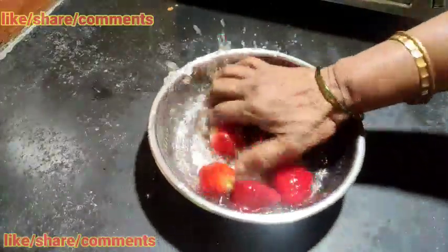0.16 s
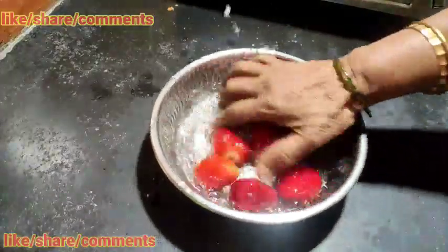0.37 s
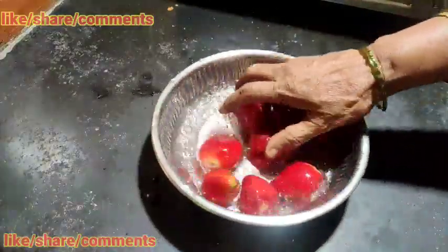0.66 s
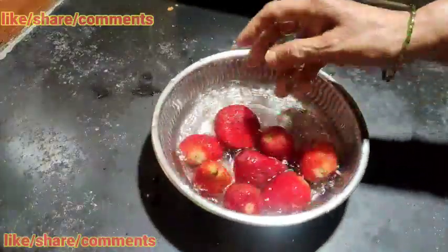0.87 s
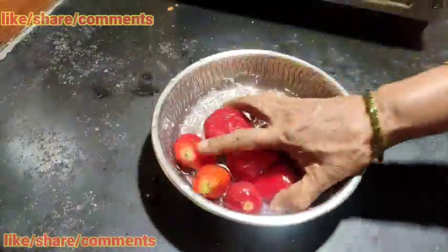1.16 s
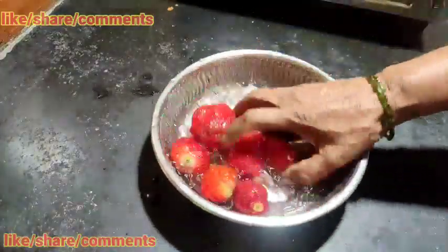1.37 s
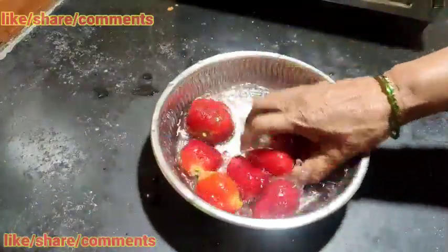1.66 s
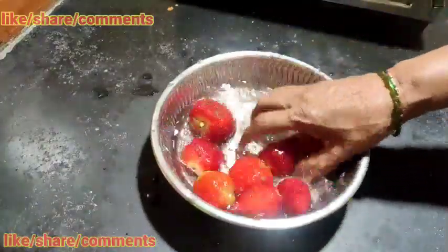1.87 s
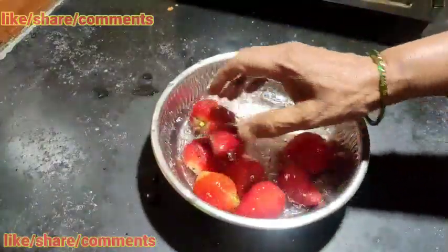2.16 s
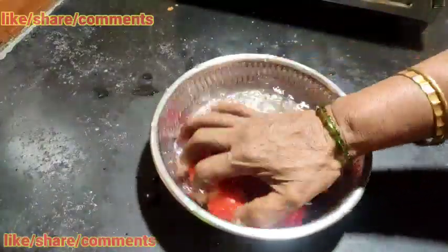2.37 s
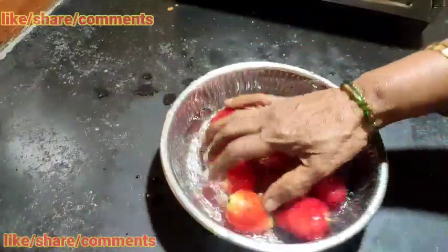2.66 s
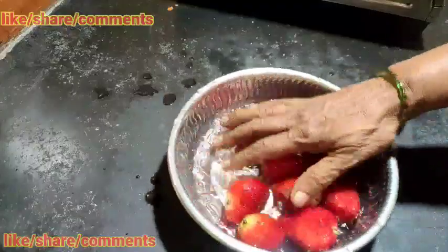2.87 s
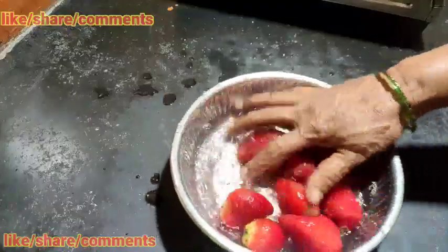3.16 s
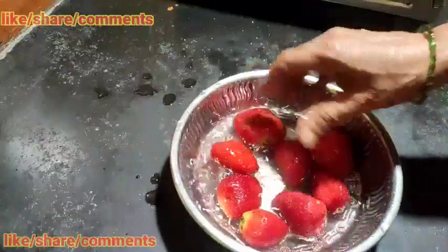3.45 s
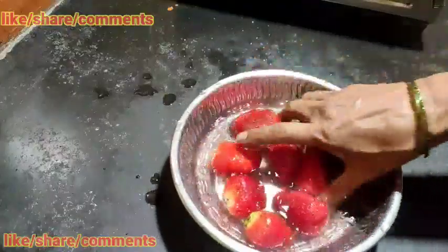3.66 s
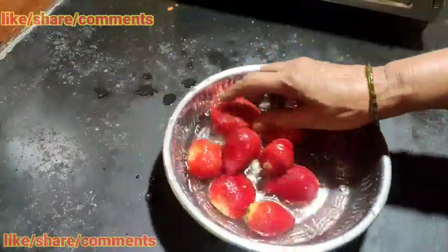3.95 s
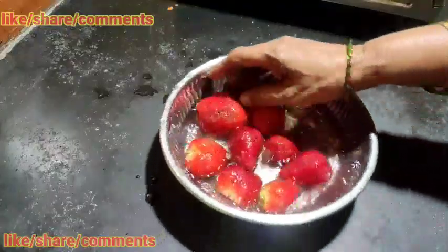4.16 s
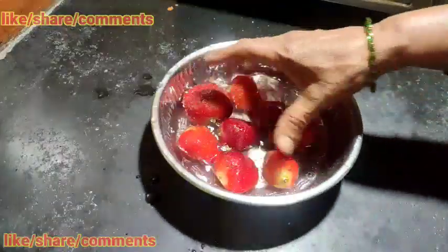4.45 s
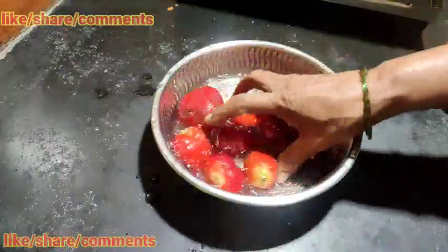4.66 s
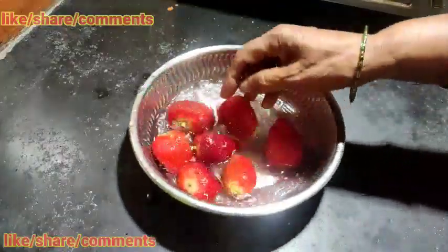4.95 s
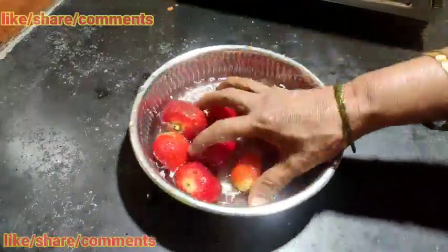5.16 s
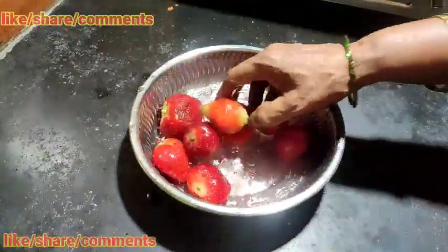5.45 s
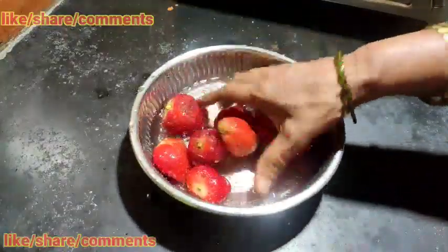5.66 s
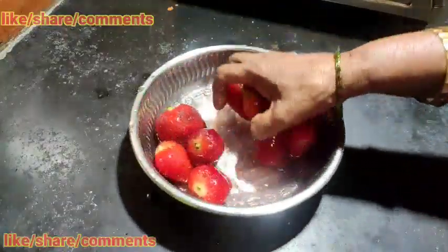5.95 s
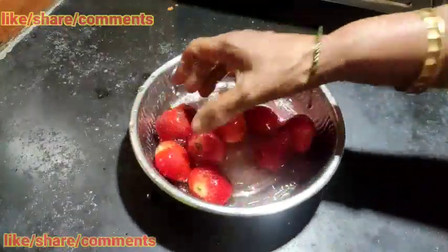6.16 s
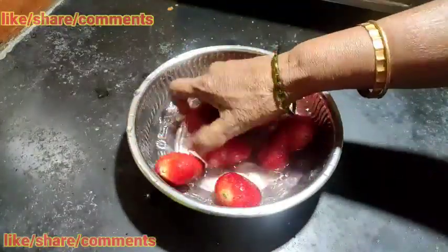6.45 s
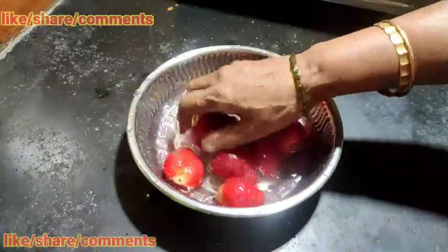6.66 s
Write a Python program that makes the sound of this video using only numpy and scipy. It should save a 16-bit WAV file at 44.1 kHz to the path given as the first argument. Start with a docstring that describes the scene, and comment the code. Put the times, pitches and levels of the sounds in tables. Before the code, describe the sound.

Close stereo view of a hand washing strawberries in a thin steel bowl on a wet stone counter. Loud splashes and hard bright knocks open it, then the bowl drops and rolls briefly to rest. Softer swishing, bubbly plops, wet smacks, gritty scrapes and scattered clanks follow, with small bangle clinks. A small kitchen gives a short tail over a faint low rumble.

```python
"""Fruit washed in a steel bowl

A hand swishes strawberries in a little water in a thin steel bowl on a wet stone counter. Damped modes
make the knocks, bumps and clinking bangles; shaped noise makes the hiss of sliding, the smacks and the spray;
decaying sines make the bubbles. Once the bowl drops back and rolls to rest on gliding bands of noise.
A small kitchen answers in a noise tail, over a low rumble, a drone and a hum."""
import sys
import numpy as np
from scipy import signal
from scipy.fft import rfft, irfft, next_fast_len
from scipy.io import wavfile
from scipy.ndimage import map_coordinates

SR = 44100
rng = np.random.default_rng(int(sys.argv[2]) if len(sys.argv) > 2 else 0)


def to_wav(sig):
    """Store sig (one row per channel, or 1-D mono) as 16-bit WAV at the path in sys.argv[1].

    Samples outside -1..1 are clipped; the rate is SR.
    """
    pcm = np.clip(np.atleast_2d(sig), -1, 1) * 32767
    pcm = np.round(pcm).astype(np.int16)
    wavfile.write(sys.argv[1], SR, pcm.T)  # frames by channels


N = 300143
T = np.arange(N) / SR  # time in the scene, s
AGE = T[:SR // 2]  # time since the onset of one sound, s


def amp(db):
    """Logarithmic level: decibels to gain."""
    return 10 ** (np.asarray(db) / 20)


def unit(x):
    """Normalization of power: scale to rms 1."""
    return x / np.sqrt(np.mean(x ** 2))


def spectrum(points):
    """Spectral envelope: gain over frequency from (Hz, dB) points, falling away below the first."""
    hz, db = np.transpose(points)
    return lambda f: amp(np.interp(np.log(f), np.log(hz), db)) * np.minimum(f / hz[0], 1) ** 2


def resonances(modes):
    """Modal response: gain over frequency of (Hz, width Hz, dB) resonances, their powers added."""
    return lambda f: np.sqrt(sum(amp(db) ** 2 / (1 + ((f - hz) / width) ** 2) ** 2
                                 for hz, width, db in modes))


def colour(x, gain):
    """Linear filtering: multiply the spectrum by a gain that depends on frequency."""
    length = x.shape[-1]
    size = next_fast_len(length + 2048)
    f = np.maximum(np.arange(size // 2 + 1) * SR / size, 1)
    return irfft(rfft(x, size) * gain(f), size)[..., :length]


def spread(mid, side, wide_hz=1300, least=0.075):
    """Spatial coherence: two spaced microphones hear alike in the bass, unrelated in the treble."""
    side = colour(side, lambda f: np.minimum(least + f / np.hypot(f, wide_hz), 1))
    return np.array([mid + side, mid - side])


def noise(gain, size=N):
    """Coloured random process: stereo noise of rms 1 with the given spectrum."""
    white = rng.standard_normal((2, size))
    return unit(colour(spread(*white), gain))


def ring(hz, envelope):
    """Phase difference: a mode reaches two microphones further out of step the higher it is, up to a limit."""
    start = rng.uniform(0, 2 * np.pi)
    leading_side = np.array([[1], [-1]]) * rng.choice([-1, 1])
    phase = start + leading_side * min(hz / 3600, .75) * rng.uniform(0.44, 1.9)
    return envelope * np.sin(2 * np.pi * hz * AGE + phase)


def add(out, s, sound):
    """Superposition: mix a sound in at time s."""
    i = max(int(s * SR), 0)
    out[:, i:i + sound.shape[1]] += sound[:, :max(N - i, 0)]


def moves(rows, attack_s, release_s):
    """Addition of powers: gain over time of movements that each gather speed, hold and die away."""
    power = 0
    for s, length, db in rows:
        rise = np.clip((T - s) / attack_s, 0, 1)
        fall = np.exp(-np.maximum(T - s - length, 0) / release_s)
        power = power + (amp(db) * rise * fall) ** 2
    return np.sqrt(power)


# The hand strokes through the water. Each row: start in seconds, length in seconds, level in dB.
STROKES = [(-.05, 0.28, -40.5), (.16, .16, -37.5), (.35, 0.14, -43.5), (.64, .14, -42), (1.13, 0.31, -48.5),
           (1.55, 0.34, -46), (1.945, 0.085, -41), (2.05, 0.14, -51), (2.3, 0.63, -49.5), (2.75, .26, -42),
           (3.1, 0.24, -56.5), (3.62, 0.64, -55.5), (4.6, 0.27, -54), (5.3, 0.12, -47), (5.78, 0.071, -45),
           (6.02, 0.46, -63), (6.68, 0.091, -57.5)]
STROKE_ATTACK_S, STROKE_RELEASE_S, RIPPLE_DB = 0.038, 0.068, -65


def stirring():
    """Flow agitation: the strength of the strokes over time, above a constant ripple."""
    return np.hypot(moves(STROKES, STROKE_ATTACK_S, STROKE_RELEASE_S), amp(RIPPLE_DB))


def bubble(hz, cycles, glide=0.029):
    """Bubble resonance: a trapped bubble rings and fades, rising in pitch as it nears the surface."""
    life = max(cycles, 1) / hz  # seconds to fade by 1 / e
    lag = rng.uniform(0, 0.0002) * rng.permutation(2)[:, None]  # one side hears it later
    age = np.maximum(AGE[:int(6 * life * SR)] - lag, 0) / life
    tone = np.sin(2 * np.pi * hz * life * age * (1 + glide * age / 2))
    return tone * np.exp(-age) * (1 - np.exp(-8 * age))


# Single loud bubbles, and two short high ticks. Each row: start in seconds, relative level in dB,
# initial pitch in Hz.
SINGLE_BUBBLES = [(0.15, -8, 7300), (6.1772, -24, 5000), (0.224, -19, 1040), (0.247, -21, 1580),
                  (0.314, -25, 880), (0.78, -22, 1800), (1.71, -22, 3200), (1.736, -21, 4150),
                  (1.793, -22.5, 1700), (1.817, -22, 4040), (1.891, -27, 1470), (1.937, -24, 1760),
                  (2.012, -21, 3280), (2.04, -19, 2160), (2.048, -24, 1165), (2.08, -27, 1980),
                  (3.068, -32, 2030), (3.357, -22, 2480), (3.813, -32, 2010), (4.934, -29, 3900),
                  (5.423, -35, 940), (5.494, -37.5, 1460), (6.081, -39, 2260)]
BUBBLE_CYCLES, BUBBLE_HZ = 5.3, 2500  # cycles to fade by 1 / e at this pitch; higher ones ring for more
# Colour of spray and bursting films. Each row: frequency in Hz, gain in dB.
SPRAY = [(300, -15.5), (900, -5.5), (2000, -3), (4000, -1), (8000, 3.5), (12000, 1.5), (15500, -10)]


def water(stir, bubbles_per_s=520, centre_hz=2800, octaves=.9, scatter_db=3, swarm_db=-3, single_db=1,
          drops_per_s=900, drop_scatter_db=4, spray_db=-3, splat_s=0.0017):
    """Entrained air and droplet impacts: stirring swells a bubble swarm and crackle; single bubbles plop or tick."""
    swarm, single = np.zeros((2, 2, N))
    hits = rng.random((2, N)) < drops_per_s / SR / 2
    signs = rng.choice([-1, 1], (2, N))
    sizes = amp(drop_scatter_db * np.minimum(rng.exponential(size=(2, N)), 4))
    drops = hits * signs * sizes
    splat = rng.standard_normal((2, 256)) * np.exp(-AGE[:256] / splat_s)
    crackle = signal.fftconvolve(drops, splat, axes=1)[:, :N]
    spray = unit(colour(spread(*crackle), spectrum(SPRAY)))

    for s, db, hz in SINGLE_BUBBLES:
        add(single, s, amp(db + single_db) * bubble(hz, BUBBLE_CYCLES * np.sqrt(hz / BUBBLE_HZ)))

    count = int(bubbles_per_s * N / SR)
    for when, pitch, size, life in rng.uniform(.001, .999, (count, 4)):
        # pitches crowd about the centre on a logarithmic scale
        hz = np.clip(centre_hz * 2 ** (octaves * np.log(pitch / (1 - pitch)) / 2), 800, 12000)
        cycles = (2 + 7 * life) * np.sqrt(hz / 2500)
        gain = amp(-scatter_db * np.log(max(size, .03)))
        add(swarm, when * N / SR, gain * bubble(hz, cycles))
    return stir * (amp(swarm_db) * unit(swarm) + amp(spray_db) * spray) + single


# The hand shoves the bowl over wet grit. Each row: start in seconds, length in seconds, level in dB.
SHOVES = [(-.03, 0.055, -32.5), (.17, 0.073, -33.5), (1.25, 0.088, -40.5), (1.5, 0.13, -47.5),
          (2.39, 0.22, -46.5), (2.76, 0.1, -33.5), (3.12, 0.048, -42.5), (3.22, 0.037, -36.5),
          (3.89, 0.12, -41.5), (4.11, 0.23, -43), (4.75, 0.11, -37.5), (5.12, 0.14, -52.5),
          (5.21, 0.096, -37.5), (5.81, 0.052, -41), (6.24, 0.16, -46)]
SHOVE_ATTACK_S, SHOVE_RELEASE_S = 0.033, 0.043
CREEP_DB = -5.5  # every stroke in the water drags the bowl a little too


def pushing(stir):
    """Transmitted force: shoves on the bowl, joined by the drag of the strokes."""
    return np.hypot(moves(SHOVES, SHOVE_ATTACK_S, SHOVE_RELEASE_S), amp(CREEP_DB) * stir)


# Colour of wet grit under steel. Each row: frequency in Hz, gain in dB.
GRIT = [(300,-13), (600,-24.5), (950,-11), (1300,-26), (1900,-9), (2900,-15), (4200,-8), (6500,-4),
        (11000,-3.5), (15500,-8.5)]
# Modes of the bowl. Each row: frequency in Hz, width in Hz, relative level in dB.
BOWL = [(920,48,-14.5), (1604,20,-9.5), (1770,34,-9.5), (1940,81,-10.5), (2153,61,-9.5), (2397,28,-16),
        (3030,51,-9.5), (3795,39,-5.5), (3940,80,-11.5), (4654,100,-7), (5360,93,-17.5), (5490,125,-8),
        (5750,41,-7), (6546,54,-11.5), (7210,67,-11.5), (7780,69,-2), (8310,88,-10), (8970,120,-8.5),
        (9580,120,-16), (10370,150,-12.5), (11100,110,-23.5), (12400,77,-15.5), (13900,130,-15)]


def slide(force, hiss_db=1.0, bowl_db=-7, catch_db=2.0, catches_per_s=120, firm_db=-38, chatter=0.8):
    """Friction noise: the base hisses in tiny catches; the firmer the push, the more the modes chatter."""
    catches = np.interp(T * catches_per_s, np.arange(4096), rng.standard_normal(4096))
    push = force * amp(catch_db * catches)
    hiss = amp(hiss_db) * noise(spectrum(GRIT))
    steel = amp(bowl_db) * (push / amp(firm_db)) ** chatter * noise(resonances(BOWL))
    return push * (hiss + steel)


# The bowl sways and its bottom drones. Each row: start in seconds, length in seconds, level in dB.
SWAYS = [(1.24, 0.27, -43.5), (1.58, .37, -45), (4.05, 0.25, -48.5), (5.22, 0.24, -45), (5.76, 0.3, -48),
         (6.3, 0.45, -52)]
SWAY_ATTACK_S, SWAY_RELEASE_S, DRONE_REST_DB = 0.094, 0.087, -54  # the presses share attack and release
# Fruit is pressed along the bottom. Each row: start in seconds, length in seconds, level in dB.
PRESSES = [(-.1, 0.49, -46.5), (1.28, 0.32, -53.5), (2.25, 0.74, -52), (3.2, 0.71, -52), (4.08, 0.26, -51),
           (4.58, 0.24, -47.5), (5.08, 0.51, -52), (5.85, 0.47, -56.5)]
HUM_REST_DB = -59
# Modes of the drone. Each row: frequency in Hz, width in Hz, relative level in dB.
DRONE_MODES = [(72.3, 9.5, -0.5), (103, 16, -12.5)]
# Modes of the hum. Each row: frequency in Hz, width in Hz, relative level in dB.
HUM_MODES = [(116, 12, -4.5), (141.5, 8.7, -1.5), (176, 11.5, -8.5), (256.8, 14.7, -11.5)]
# Colour of the house rumble. Each row: frequency in Hz, gain in dB.
RUMBLE = [(15,-6.5), (28,1.5), (48,-10.5), (100,-24.5), (150,-15), (220,-19), (400,-27), (1000,-37),
          (3000,-41.5), (9000,-48), (15500,-46)]


def background(rumble_db=-50, wander_db=2.5, wanders_per_s=6):
    """Forced low resonance: swaying swells a drone and pressed fruit a hum, over a wavering house rumble."""
    sway = np.hypot(moves(SWAYS, SWAY_ATTACK_S, SWAY_RELEASE_S), amp(DRONE_REST_DB))
    press = np.hypot(moves(PRESSES, SWAY_ATTACK_S, SWAY_RELEASE_S), amp(HUM_REST_DB))
    drone = sway * noise(resonances(DRONE_MODES))
    hum = press * noise(resonances(HUM_MODES))
    wander = np.interp(T * wanders_per_s, np.arange(256), rng.standard_normal(256))
    rumble = amp(rumble_db + wander_db * wander) * noise(spectrum(RUMBLE))
    return rumble + drone + hum


# The bowl knocks on the stone. Each row: start in seconds, level in dB, body under 2.5 kHz in dB,
# ring length as a factor.
KNOCKS = [(0.0326, -9.5, -2.5, 1.36), (0.1642, 1.5, -7.5, 0.98), (0.1853, -12, -2, 1.4),
          (0.197, -12.5, 0, 1.1), (0.241, -11, -2, 1.5), (.395, -2.5, -4, 0.76), (0.4067, -8.5, -8, 1.25),
          (1.1342, -24, -5.5, 1.14), (1.246, -6, -11, 2), (1.305, -10.5, -12, 1.66),
          (2.6607, -12.5, 1.5, 1.73), (2.7834, -13, -5.5, 1.1), (2.795, -21, -8, 1.3),
          (2.847, -15, -20, 1.8), (2.883, -17, -12, 1.4), (3.01, -22, -11, 1.55), (3.3284, -5, -8, 1.23),
          (3.3983, -16.5, -13, .85), (3.901, -8, -5, 1.15), (3.919, -14.5, -4, 1.9),
          (4.7311, -2.5, -10, 1.12), (4.7725, -10.5, -12.5, 1.32), (5.2252, -8, -11.5, 2.13),
          (5.3383, -6.5, -13, 1.44), (5.3688, -16, -9, 1.1), (5.8101, -7.5, -11.5, 1.2),
          (5.933, -16.5, -12, 0.97)]
# Colour of the crowded modes. Each row: frequency in Hz, gain in dB.
CLATTER = [(300,-5.5), (600,-18), (950,-11), (1200,-9), (1650,-2.5), (2600,-17.5), (3020,0.5), (3400,-8.5),
           (3900,-4), (5400,-3), (6150,-9), (7800,-9), (11000,-10.5), (15500,-22.5)]
TOP_DB, TOP_PER_BODY = 10.5, 0.64  # a flatter landing lifts both the body and the top over 10 kHz


def knocks(mode_db=-3, clatter_db=-12, clatter_s=.006, linger_db=-25, linger_s=0.089, rise_s=0.00052,
           damping=0.85, ring_db=-26, ring_s=0.054):
    """Contact damping: steel modes die fast while the rim touches the stone, then ring on faintly."""
    out = np.zeros((2, N))
    strength = np.array([amp(db) * width for _, width, db in BOWL])
    strength = strength / np.linalg.norm(strength)
    linger = amp(linger_db) * np.exp(-AGE / linger_s)
    after_ring = amp(ring_db) * np.exp(-AGE / ring_s)
    for s, db, body_db, length in KNOCKS:
        top_db = TOP_DB + TOP_PER_BODY * body_db
        tone = lambda f: amp(body_db / (1 + (f / 2500) ** 4) + top_db / (1 + (10000 / f) ** 6))
        clatter = noise(lambda f: spectrum(CLATTER)(f) * tone(f), size=len(AGE))
        sound = amp(clatter_db) * clatter * (np.exp(-AGE / (clatter_s * length)) + linger)
        for (hz, width, _), a in zip(BOWL, strength):
            fade = np.exp(-np.pi * width * damping * AGE / length) + after_ring
            # the point of contact and the shifting water weight and detune each mode anew
            weight = amp(2.1 * rng.standard_normal())
            detune_hz = 15 * rng.standard_normal()
            sound += amp(mode_db) * weight * a * tone(hz) * ring(hz + detune_hz, fade)
        add(out, s, amp(db) * sound * (1 - np.exp(-AGE / rise_s)))
    return out


# Wet smacks of fingers and fruit. Each row: start in seconds, relative level in dB,
# body under 2.5 kHz in dB.
SMACKS = [(0.0912, -14, 2), (0.2297, -6.5, -1), (0.632, -12, -3.5), (0.693, -21.5, 15),
          (1.5555, -14.5, -14), (1.5965, -14, 14.5), (1.692, -16.5, -13), (1.736, -17.5, -17),
          (1.792, -12.5, 7.5), (1.8165, -20, -7), (1.936, -12, 8.5), (1.9616, -7.5, 4), (2.027, -16.5, 3),
          (2.0466, -16, -7), (2.3358, -22.5, -28), (2.3995, -14, -1), (2.5688, -19.5, 6), (2.75, -10, -18),
          (2.9927, -24, 17), (3.231, -12.5, -10), (5.147, -28.5, -9), (5.46, -29, -9.5), (6.23, -17, 18),
          (6.5853, -34.5, -16)]


def smacks(stir, level_db=-12, decay_s=0.0051, film_db=2.5, cavity_db=-9, cavity_hz=4200, patter_s=.012,
           small_per_s=12, small_db=22, scatter_db=8):
    """Film rupture: thin water films burst between skin and fruit with tiny cavities; small ones follow stirring."""
    out = np.zeros((2, N))
    small = []
    for when, size in rng.random((int(small_per_s * N / SR), 2)):
        stir_db = 20 * np.log10(stir[int(when * N)])
        small.append((when * N / SR, stir_db + small_db - scatter_db * size, 0))
    for s, db, body_db in SMACKS + small:
        tone = lambda f: amp(body_db / (1 + (f / 2500) ** 4))
        burst = noise(lambda f: spectrum(SPRAY)(f) * tone(f), size=4096)
        tearing = amp(film_db * np.repeat(rng.standard_normal(64), 64))  # level jumps in short steps
        fade = np.exp(-AGE[:burst.shape[1]] / decay_s)
        add(out, s, amp(db + level_db) * burst * tearing * fade)
        for delay, octave in rng.random((3, 2)):
            cavity = bubble(cavity_hz * 2 ** (2 * octave - 1), cycles=6.3)
            add(out, s + delay * patter_s, amp(db + cavity_db - 10 * delay) * cavity)
    return out


# Fruit bumps on the bottom. Each row: start in seconds, level in dB, pitch in Hz.
BUMPS = [(0.407, -34, 266), (0.739, -31, 376), (1.248, -35.5, 297), (1.404, -37.5, 255),
         (1.673, -38.5, 271), (2.356, -40, 271), (2.762, -38.5, 239), (3.237, -35, 394), (4.611, -43, 260),
         (4.812, -39, 356), (4.846, -30.5, 257), (5.558, -36.5, 264), (6.201, -32.5, 249),
         (6.229, -37.5, 250)]


def bumps(tone_db=-2, thud_db=-10, thud_hz=650, rise_s=0.00079, decay_s=0.016):
    """Mass loading and soft impact: fruit nudges the water-loaded bottom into a low tone and a thud."""
    out = np.zeros((2, N))
    fade = np.exp(-AGE / decay_s) * (1 - np.exp(-AGE / rise_s))
    for s, db, hz in BUMPS:
        thud = noise(lambda f: f / thud_hz / (1 + (f / thud_hz) ** 4), size=len(AGE))
        add(out, s, amp(db) * (amp(tone_db) * ring(hz, fade) + amp(thud_db) * thud * fade))
    return out


# Bangles clink. Each row: start in seconds, level in dB.
CLINKS = [(0.652, -22.5), (3.2748, -26.5), (3.7516, -21), (5.7413, -24), (6.177, -37.5), (6.6808, -32)]
# Modes of a bangle. Each row: mean frequency in Hz, relative level in dB, time to fall 60 dB in seconds.
BANGLE = [(4350,-35,.04), (6300,-12,0.09), (8400,0,0.077), (11430,8.5,0.086), (12400,6,0.053),
          (13000,-6,.04), (13600,4,0.088)]


def bangles(ring_db=-13, tick_db=-9, tick_s=0.011):
    """Damped modal ringing: bangles touch on the wrist with a tick, their modes damped by the skin."""
    out = np.zeros((2, N))
    for s, db in CLINKS:
        modes = 0
        for hz, gain_db, t60 in BANGLE:
            detune = 1 + 0.0165 * rng.standard_normal()
            modes = modes + ring(hz * detune, amp(gain_db - 60 * AGE / t60))
        tick = noise(spectrum(GRIT), size=len(AGE)) * np.exp(-AGE / tick_s)
        add(out, s, amp(db) * (amp(ring_db) * modes + amp(tick_db) * tick))
    return out


# Resonances as the base drops back and rolls. Each row: first frequency in Hz, last frequency in Hz,
# width in Hz at the first frequency, blow level in dB, first roll level in dB, last roll level in dB.
ROLL = [(800, 830, 210, -14.5, -35.5, -65.5), (943, 800, 120, -9.5, -36, -66),
        (3380, 3480, 139, -24, -46, -51), (5554, 6200, 190, -9.5, -38.5, -56),
        (9070, 10200, 580, -17, -40, -42.5), (11600, 11000, 400, -12.5, -44, -53),
        (12800, 14000, 620, -20, -38, -52)]
ROLL_START_S, ROLL_LENGTH_S = .7402, .28


def roll(blow_s=0.0073, crack_db=-21, crack_s=0.0073, stop_s=0.0084, speedup=1.4, grit_db=-47,
         wobble_db=3.0, wobbles_per_s=35):
    """Rolling contact: the base slaps down, then its edge rolls as resonances glide and fade unevenly."""
    progress = np.minimum(AGE / ROLL_LENGTH_S, 1)
    gate = (1 - np.exp(-AGE / blow_s)) / (1 + np.exp((AGE - ROLL_LENGTH_S) / stop_s))
    sound = amp(crack_db) * noise(spectrum(SPRAY), size=len(AGE)) * np.exp(-AGE / crack_s)
    grit = noise(lambda f: spectrum(GRIT)(f) * (f / np.hypot(f, 6000)) ** 4, size=len(AGE))
    sound += amp(grit_db) * gate * grit
    for first_hz, last_hz, width, blow_db, first_db, last_db in ROLL:
        glide_hz = first_hz + (last_hz - first_hz) * progress ** speedup
        band = noise(lambda f: 1 / (1 + ((f - first_hz) / width) ** 2) ** 2, size=SR)
        # reading the band at a changing speed makes its pitch glide
        place = np.cumsum(glide_hz / first_hz)
        rub = np.array([map_coordinates(side, [place], order=5) for side in band])
        wobble = wobble_db * np.interp(AGE * wobbles_per_s, np.arange(64), rng.standard_normal(64))
        roll_db = first_db + (last_db - first_db) * progress + wobble
        blow = ring(first_hz, amp(blow_db) * np.exp(-AGE / blow_s))
        sound += rub * gate * amp(roll_db) + blow
    out = np.zeros((2, N))
    add(out, ROLL_START_S, sound)
    return out


# Reverberation of the kitchen. Each row: frequency in Hz, time to fall 60 dB in seconds.
ROOM_T60 = [(200, 1), (1500, 0.34), (5000, 0.34), (15000, 0.086)]


def kitchen(x, wet_db=-11, gap_s=0.0017):
    """Reverberation: near hard walls give a dense short tail, the treble dying first."""
    hz, t60 = np.transpose(ROOM_T60)
    echoes = noise(lambda f: np.ones_like(f), size=len(AGE))
    tail = 0
    for share, t in zip(np.eye(len(hz)), t60):  # overlapping bands that add up to the whole
        band = colour(echoes, lambda f: np.interp(np.log(f), np.log(hz), share))
        tail = tail + band * amp(-60 * AGE / t)
    tail = tail * np.clip(AGE / gap_s - 1, 0, 1)
    tail = tail / np.sqrt(np.sum(tail ** 2) / 2)
    return x + amp(wet_db) * signal.fftconvolve(x, tail, axes=1)[:, :N]


def scene():
    """Superposition of sources: the hand stirs and pushes, and the kitchen answers all but the background."""
    stir = stirring()
    push = pushing(stir)
    bowl = knocks() + roll() + slide(push)
    wet = smacks(stir) + water(stir)
    return kitchen(bowl + wet + bumps() + bangles()) + background()


TOP_HZ = 15500


def record(dry):
    """Saturation and band limiting: the phone clips at full scale and cuts the top."""
    low_pass = signal.ellip(10, .2, 80, TOP_HZ, fs=SR, output="sos")
    return signal.sosfilt(low_pass, np.clip(dry, -1, 1))


dry = scene()
out = record(dry)
to_wav(out)
```